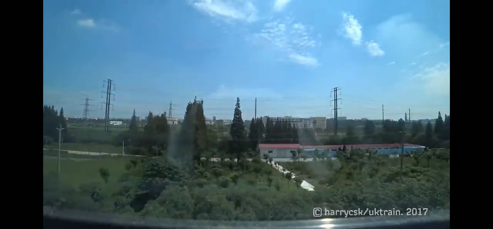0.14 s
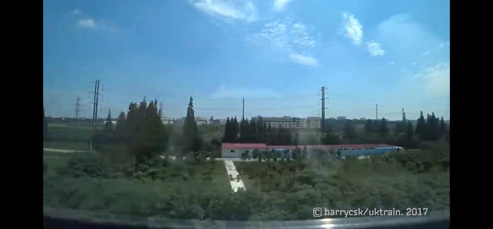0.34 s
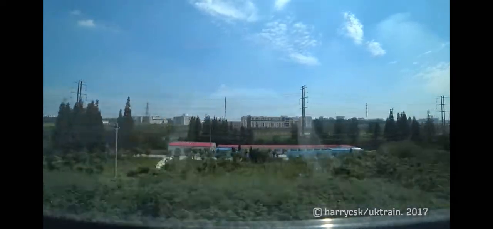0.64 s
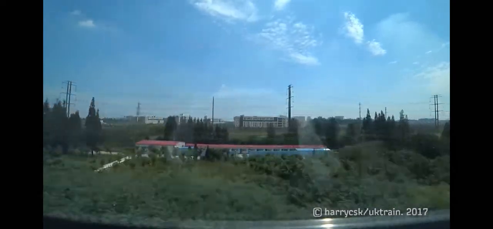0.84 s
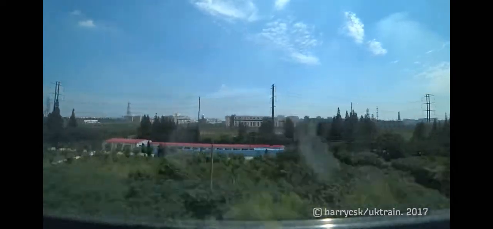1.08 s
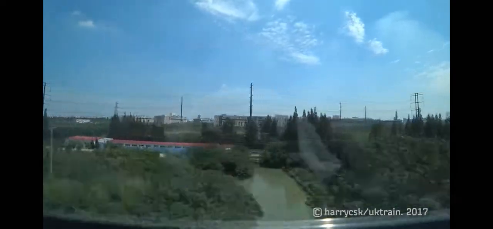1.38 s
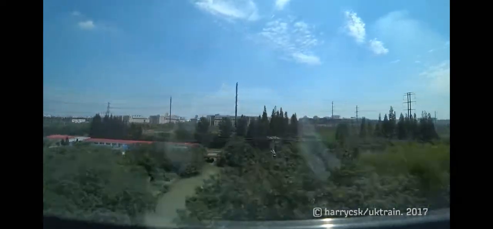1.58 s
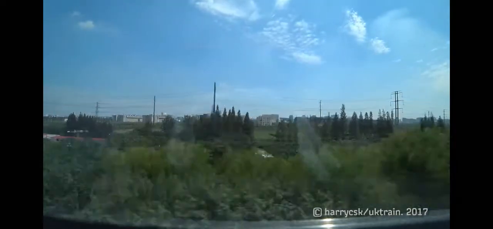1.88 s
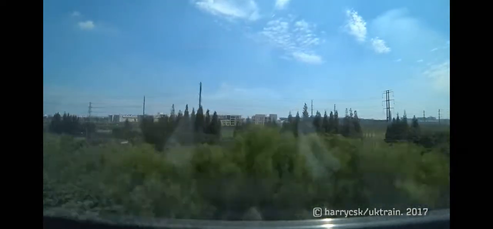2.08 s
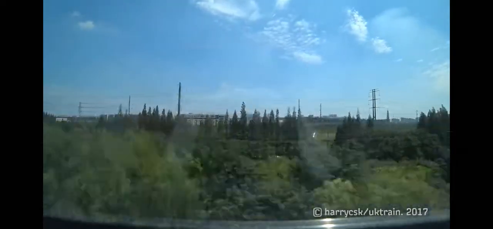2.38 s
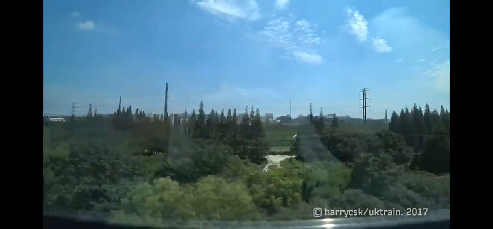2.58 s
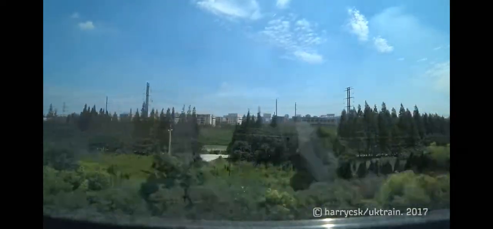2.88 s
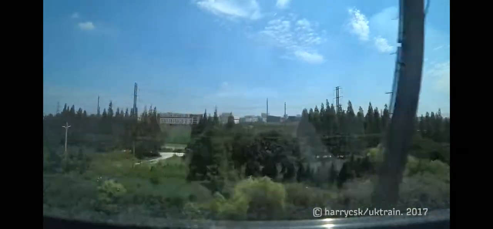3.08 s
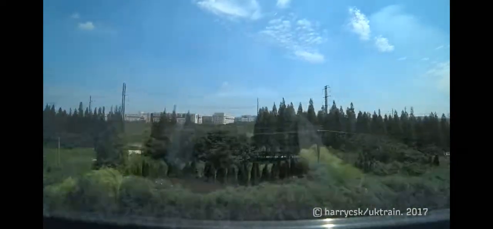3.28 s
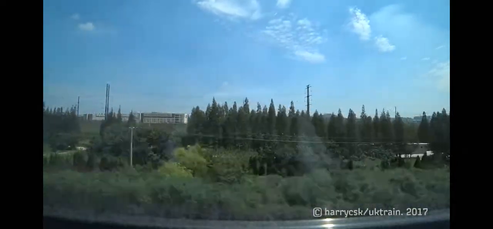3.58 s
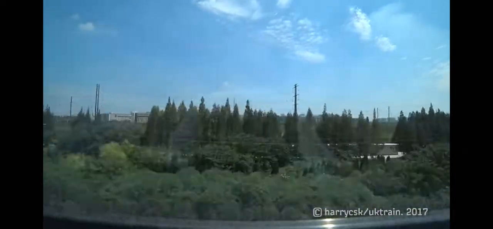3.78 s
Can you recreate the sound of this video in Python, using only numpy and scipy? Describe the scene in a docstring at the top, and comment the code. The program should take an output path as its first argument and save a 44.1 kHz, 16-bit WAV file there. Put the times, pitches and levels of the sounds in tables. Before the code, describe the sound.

Steady deep rumble and rush inside a speeding train, with a faint hum and whine.

```python
"""A deep rumble and a wide rush fill a high-speed train, heard beside a window as it gathers speed.
Both come from wheels and air, coloured by the resonances of the carriage. The running gear hums,
the wheels sing and drone, and the drive whines, all creeping up in pitch together.
A fine crackle and a few faint ticks lie on top; a hollow moan comes up as the singing fades."""
import sys
import numpy as np
from scipy import signal
from scipy.fft import rfft, irfft
from scipy.io import wavfile

SR = 44100
rng = np.random.default_rng(int(sys.argv[2]) if len(sys.argv) > 2 else 0)


def materialize(psi):
    """Save the field psi as 16-bit PCM at rate SR to the path in sys.argv[1].

    A 1-D psi becomes a single channel; in a 2-D psi each row is a channel.
    """
    bounded = np.clip(np.atleast_2d(psi).T, -1, 1)
    quanta = np.round(bounded * 32767).astype(np.int16)
    wavfile.write(sys.argv[1], SR, quanta)


N = 173754
T, HZ = np.arange(N) / SR, np.fft.rfftfreq(N, 1 / SR)


def amp(db):
    """Decibels to gain."""
    return 10 ** (np.asarray(db) / 20)


def curve(table, column=1):
    """One column of a spectrum table at every frequency."""
    rows = np.array(table)
    return np.interp(np.log(HZ + 1), np.log(rows[:, 0] + 1), rows[:, column])


def fader(table, column=1):
    """One column of a time table at every sample."""
    rows = np.array(table)
    return np.interp(T, rows[:, 0], rows[:, column])


def stereo_fader(table):
    """Left and right gain curves."""
    return amp([fader(table), fader(table, column=2)])


def pan(db):
    """Left and right gains, with the left louder by db."""
    return amp(np.array([[.5], [-.5]]) * db)


def wander(rate_hz):
    """Smooth random modulation of unit size, up to about the given rate."""
    drift = irfft(rfft(rng.standard_normal(N)) * np.exp(-.5 * (HZ / rate_hz) ** 2) * (HZ > 0), N)
    return drift / drift.std()


# resonant peaks of the carriage (frequency [Hz], width [Hz], lift [dB])
CABIN_PEAKS = [(61.6, 60, 1.5), (109.4, 36, 2), (237, 28, 1), (313.4, 42, 2.5), (441, 16, 3.5),
               (492, 17, 4.5), (532, 60, 3.5), (637, 82, 1.5), (755, 40, 1.5), (1078, 19, 1),
               (1205, 60, 1.5), (1470, 20, 3), (2940, 15, 2), (3130, 610, 0.7), (4780, 190, 5),
               (5380, 190, 4.5), (5950, 180, 4.5)]
# stereo image (frequency [Hz], likeness of the sides [0-1], left lead [rad], left louder by [dB])
CABIN_IMAGE = [(40, .98, .36, 3.4), (75, .98, .42, 3), (120, .96, .58, 2.7), (215, .9, .58, 2.4),
               (310, .52, .95, .8), (390, .45, 1.7, 0), (500, .55, .85, 2), (1100, .48, .6, 2.3),
               (1750, .12, .8, 2.2), (2300, .62, .25, .8), (3200, .75, .2, .1), (4800, .8, .05, .4),
               (6600, .62, -.1, .4), (7900, .3, .9, 1), (10000, .55, .2, 1.6)]

def cabin_noise(spectrum):
    """Noise coloured by the carriage's resonances, partly alike at the two sides."""
    left, other = rfft(rng.standard_normal((2, N)))
    likeness = np.clip(curve(CABIN_IMAGE), 0, 1)
    right = likeness * left + np.sqrt(1 - likeness ** 2) * other
    right *= np.exp(-1j * curve(CABIN_IMAGE, column=2))
    pair = np.array([left, right]) * pan(curve(CABIN_IMAGE, column=3))
    lift_db = sum(db * np.exp(-np.log(2) * (2 * (HZ - hz) / width) ** 2) for hz, width, db in CABIN_PEAKS)
    return irfft(pair * amp(curve(spectrum) + lift_db), N) * np.sqrt(SR / 2)


# low bed, before the cabin colours it (frequency [Hz], level [dB per Hz])
RUMBLE_SPECTRUM = [(8, -49), (20, -42), (40, -43.5), (52, -36), (80, -38.5), (118, -38), (142, -39.5),
                   (170, -41), (230, -44.5), (300, -50.5), (450, -57), (1000, -109.5)]

def rumble():
    """The deep, even noise of the bogies, coming through the floor."""
    return cabin_noise(RUMBLE_SPECTRUM)


# airy bed, before the cabin colours it (frequency [Hz], level [dB per Hz])
RUSH_SPECTRUM = [(100, -66), (320, -56.5), (420, -57.5), (620, -55.5), (720, -60), (1020, -63),
                 (1350, -67.5), (1950, -77.5), (2450, -81.5), (3350, -80), (3950, -87), (5000, -92.5),
                 (6300, -96.5), (7200, -103.5), (9200, -112.5), (11000, -111.5)]
# gentle fader ride on the rush (time [s], gain [dB])
RUSH_RIDE = [(0, 0.5), (1, 0.06), (2.2, 0.2), (3.2, 0), (3.94, 0.25)]

def rush(flutter_db=.82):
    """Wheel and air noise through the walls, fluttering with the turbulence along the body."""
    return cabin_noise(RUSH_SPECTRUM) * amp(fader(RUSH_RIDE) + flutter_db * wander(rate_hz=30))


SPEED_GAIN_PER_S = .0089  # share of the starting speed

def rising_tone(start_hz, lead_rad, waver=1.5, waver_hz=14):
    """A tone that rises with the train's speed, left side leading; rough unless the waver is eased."""
    turns = np.cumsum(start_hz * (1 + SPEED_GAIN_PER_S * T)) / SR + rng.random()
    phase = 2 * np.pi * turns - np.array([[0], [lead_rad]])
    jitter = (wander(waver_hz) + 1j * wander(waver_hz)) / np.sqrt(2)  # shakes both level and phase
    unsteady = (1 + waver * jitter) / np.sqrt(1 + waver ** 2)
    return np.sqrt(2) * (unsteady * np.exp(1j * phase)).real


def gear_hum(level_db=-23.8):
    """The running gear's low hum, slowly wavering."""
    return amp(level_db) * pan(db=2) * rising_tone(start_hz=170.6, lead_rad=.72, waver=.45, waver_hz=3.5)


# the singing swells, then falls away (time [s], left level [dB], right level [dB])
SING_LEVELS = [(0, -38, -36), (.5, -34, -32), (.95, -39.5, -41), (1.45, -32, -33.5), (1.85, -28.5, -43),
               (2.4, -52, -59), (3.94, -48.5, -51)]

def wheel_sing():
    """Rough, mid-range singing from the wheels."""
    return stereo_fader(SING_LEVELS) * rising_tone(start_hz=612, lead_rad=1.0)


# the drone starts full and dies away (time [s], left level [dB], right level [dB])
DRONE_LEVELS = [(0, -35, -29.5), (1.3, -38.5, -33), (1.7, -47.5, -44), (3.94, -54.5, -52.5)]

def wheel_drone():
    """A lower, rough wheel tone, wide and leaning right."""
    return stereo_fader(DRONE_LEVELS) * rising_tone(start_hz=364, lead_rad=2.56)


# second harmonic, drifting in and out at each side (time [s], left level [dB], right level [dB])
WHINE_SECOND = [(0, -32, -36), (.2, -38, -38), (.45, -34.5, -35.5), (.8, -37, -35.5), (1.03, -64, -36),
                (1.4, -36.5, -48), (1.85, -35.5, -42.5), (2.15, -44.5, -58), (2.45, -47, -45.5),
                (2.72, -53, -39.5), (3.05, -55, -43), (3.22, -34.5, -37), (3.38, -36, -37),
                (3.44, -28.5, -31.5), (3.7, -30, -33.5), (3.78, -29.5, -32), (3.94, -28, -30)]
# fainter third harmonic (time [s], left level [dB], right level [dB])
WHINE_THIRD = [(0, -55, -58), (.7, -57.5, -71), (1.599, -55.5, -44), (3.18, -55.5, -49.5),
               (3.25, -45.5, -49.5), (3.94, -43, -45.5)]

def drive_whine(base_hz=438.5):
    """Two clean harmonics of the drive, climbing with the speed."""
    return sum(stereo_fader(levels) * rising_tone(harmonic * base_hz, lead_rad=.7, waver=.1, waver_hz=9)
               for harmonic, levels in [(2, WHINE_SECOND), (3, WHINE_THIRD)])


def snaps(hits, low_hz, high_hz=10900):
    """Turns each impulse into a tiny bright click of the same peak, with no ring."""
    band = signal.butter(2, [low_hz, high_hz], "band", fs=SR, output="sos")
    click = signal.sosfilt(band, signal.unit_impulse(SR // 100))
    return signal.oaconvolve(hits, click / abs(click).max())[:N]


def crackle(per_s=55, level_db=-54.5, spread_db=1.8):
    """A fine grain on top of the hiss: weak, thin snaps at random moments."""
    fires = rng.random(N) < per_s / SR
    hits = fires * amp(level_db + spread_db * rng.standard_normal(N))
    return snaps(hits, low_hz=8600) * pan(db=1.5)


# tick cues (time [s], peak before panning [dB])
TICK_CUES = [(.3757, -37), (.494, -37), (.6293, -43), (.8763, -40), (2.2069, -42), (2.3514, -44),
             (3.0523, -44.5), (3.060, -35), (3.7129, -43), (3.7996, -37), (3.8125, -43.5)]

def ticks():
    """Faint, dry snaps that poke out of the hiss, mostly at the left."""
    hits = np.zeros(N)
    for time_s, peak_db in TICK_CUES:
        hits[round(time_s * SR)] = amp(peak_db)
    return snaps(hits, low_hz=2800) * pan(db=7)


# the moan stays buried until the singing fades (time [s], left level [dB], right level [dB])
MOAN_LEVELS = [(0, -52, -52), (2.2, -48, -50), (2.5, -38, -44), (3.4, -39, -47), (3.65, -44, -45),
               (3.94, -35, -38)]

def wheel_moan():
    """A rough, hollow wheel tone, pitched between the drone and the singing."""
    return stereo_fader(MOAN_LEVELS) * rising_tone(start_hz=511, lead_rad=.89)


def scene():
    """The mix at the window seat."""
    bed = rumble() + rush()
    tones = gear_hum() + wheel_sing() + wheel_drone() + drive_whine()
    return bed + tones + crackle() + ticks() + wheel_moan()


def record(dry):
    """A short fade at each end and a steep cut of the top treble."""
    cutoff_hz, fade_s = 10950, .003
    lowpass = signal.ellip(10, .05, 50, cutoff_hz, fs=SR, output="sos")
    fades = np.clip(np.minimum(T, T[-1] - T) / fade_s, 0, 1)
    return signal.sosfiltfilt(lowpass, dry * fades)


dry = scene()
out = record(dry)
materialize(out)
```